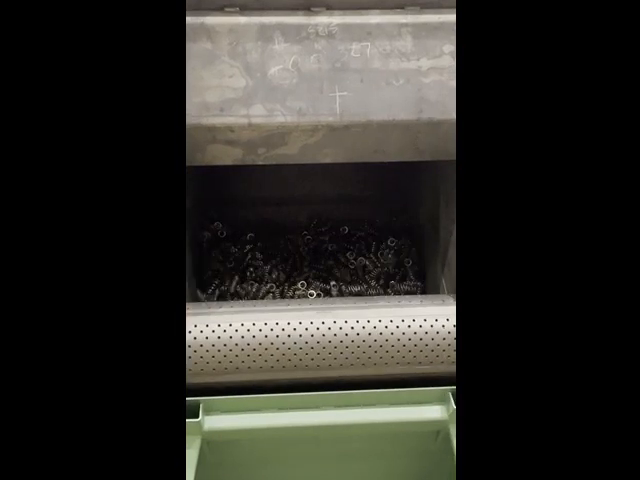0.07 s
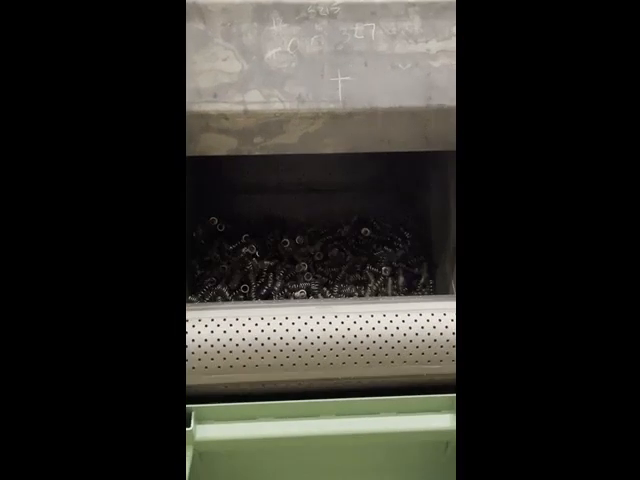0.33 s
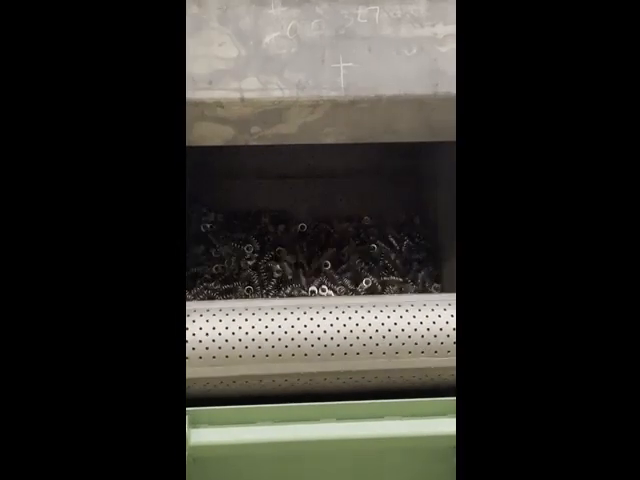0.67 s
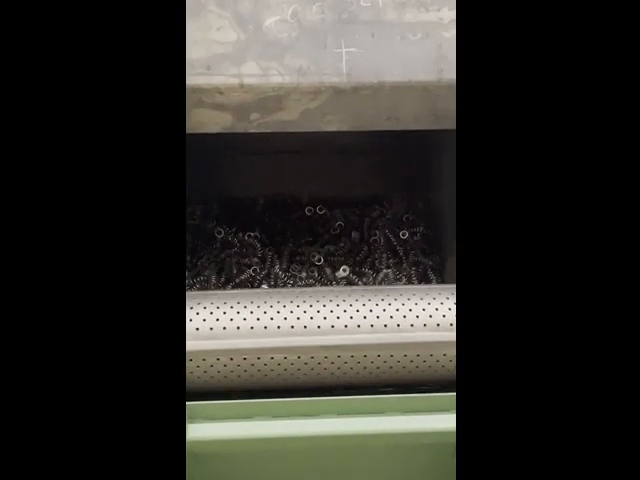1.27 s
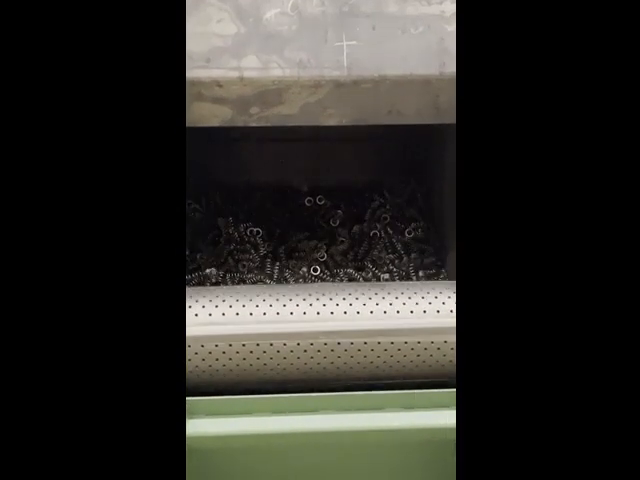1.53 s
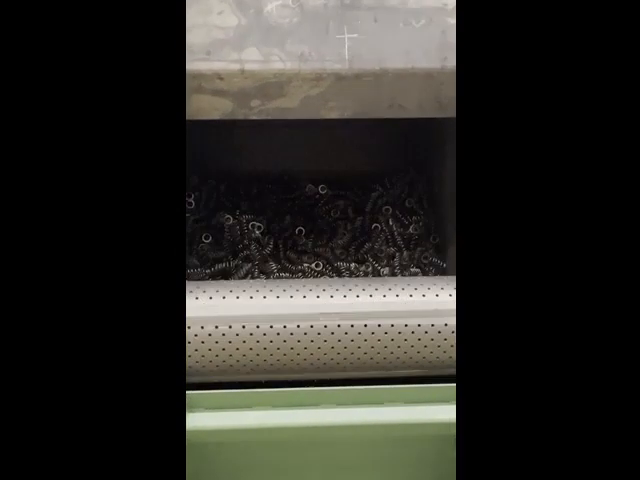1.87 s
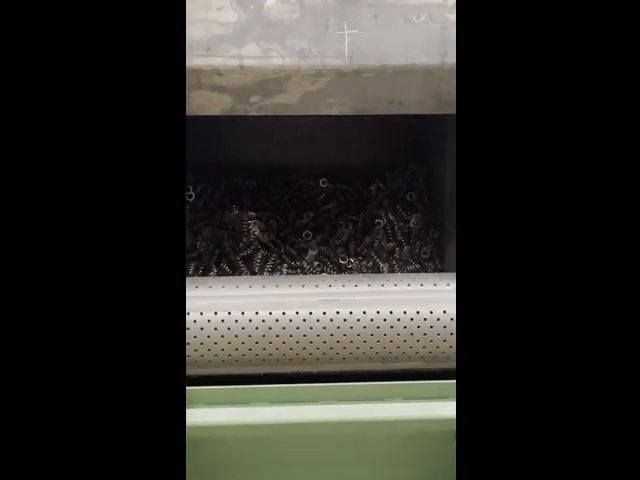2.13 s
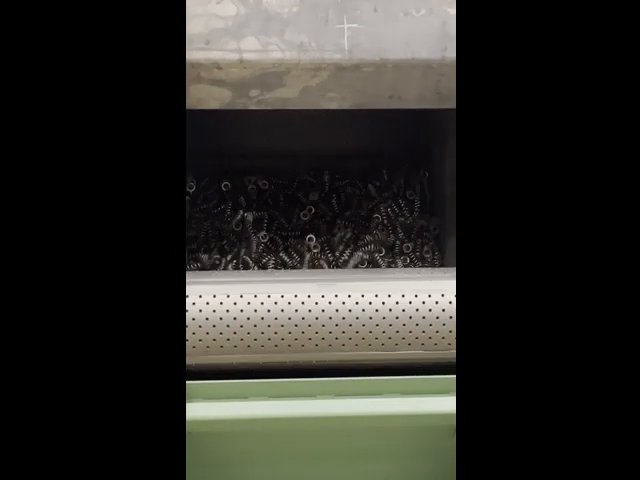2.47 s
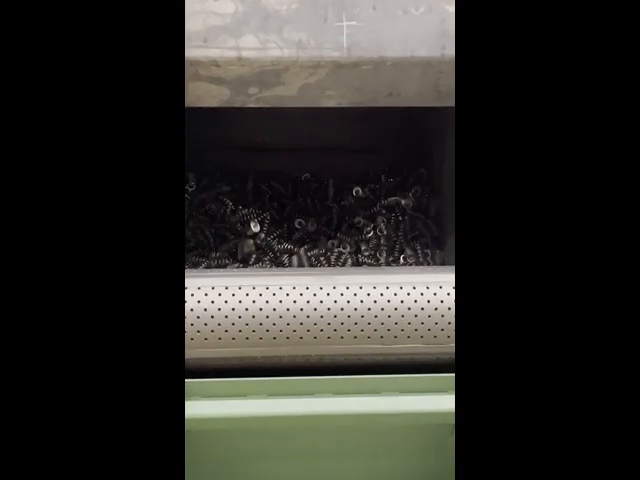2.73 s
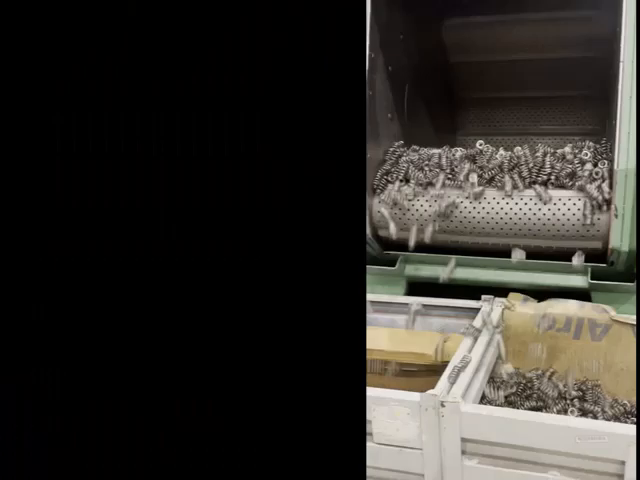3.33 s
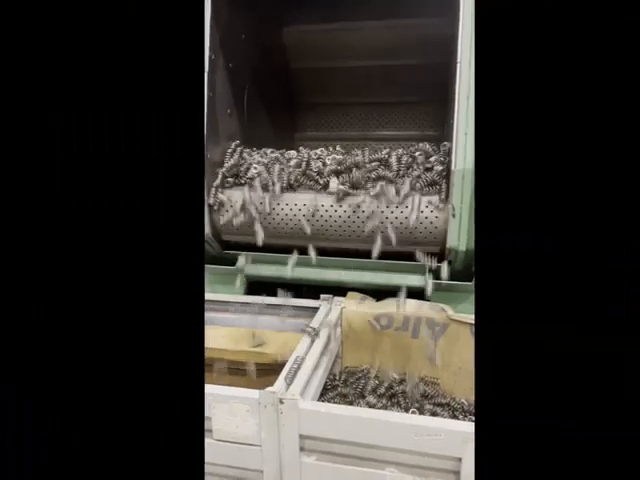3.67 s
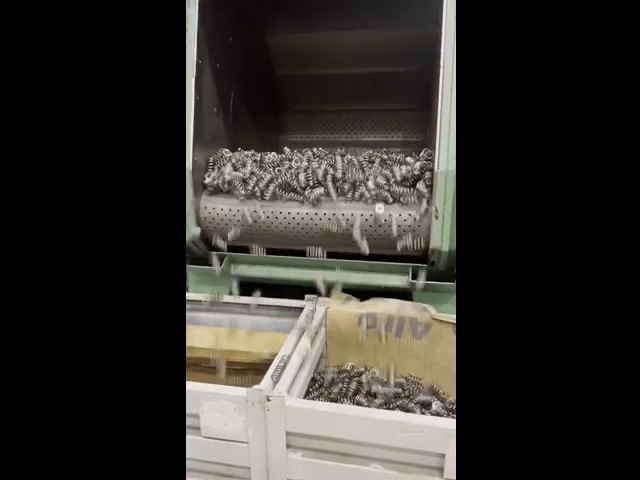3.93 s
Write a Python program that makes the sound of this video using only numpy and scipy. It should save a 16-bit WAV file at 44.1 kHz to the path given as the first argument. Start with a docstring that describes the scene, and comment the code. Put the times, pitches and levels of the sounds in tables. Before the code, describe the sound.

A factory tumbling machine rolls a heap of small metal parts, hissing and pattering above a rumble and steady whine. Near the end they clatter loudly against the steel wall, and the sound switches abruptly to parts landing in a bin.

```python
"""A tumbling machine rolls a heap of small steel parts in its drum. From the start they slide over each
other in a bright sizzle, above a low rumble and a fan's whine, and soon patter lightly on the steel wall.
The sizzle sinks midway, then swells; from about 2.9 s the parts clatter hard and clumps knock on the wall.
At 3.8 s the scene cuts to the machine unloading, with parts dropping into a bin."""
import sys
import numpy as np
from scipy import signal
from scipy.fft import rfft, irfft
from scipy.io import wavfile

SR = 44100
rng = np.random.default_rng(int(sys.argv[2]) if len(sys.argv) > 2 else 0)


def materialize(psi):
    """Save the field psi as 16-bit PCM at rate SR to the path in sys.argv[1].

    A 1-D psi becomes a single channel; in a 2-D psi each row is a channel.
    """
    bounded = np.clip(np.atleast_2d(psi).T, -1, 1)
    quanta = np.round(bounded * 32767).astype(np.int16)
    wavfile.write(sys.argv[1], SR, quanta)


N = 176400
T = np.arange(N) / SR
CUT_S, CUT_FADE_S = 3.817, .008


# Tone colour of the sliding parts: freq_hz, density_db
SIZZLE_COLOUR = [(300, -45), (1100, -12), (1700, -6.5), (2300, -10.6), (4300, -10.8), (6500, -7.8),
                 (8000, -5), (9300, -2.2), (10800, -3.8), (11800, -7.2), (13200, -10.6), (15000, -7.2),
                 (15800, -7.8)]
# Resonances of the small parts: pitch_hz, half_width_hz, boost_db
PART_RESONANCES = [(7400, 130, 5), (8570, 170, 5), (9620, 190, 4.8), (10820, 170, 4), (12200, 200, 3),
                   (13720, 200, 4.3), (15350, 220, 7)]
# How strongly the heap slides: time_s, level_db
SLIDE_ENVELOPE = [(0, -22), (.35, -19.5), (.65, -20.5), (1.0, -21), (1.28, -23), (1.45, -26), (1.85, -27.5),
                  (2.2, -25), (2.5, -21.5), (2.8, -17.5), (3.05, -17), (3.25, -17.5), (3.5, -20),
                  (3.8, -21.5)]
def sizzle(hits_per_s=17000, flicker_db=.35):
    """Thousands of tiny collisions a second ring the parts themselves as they slide."""
    clicks = sheet_ring(impacts(hits_per_s, spread_db=1.4), wet=.35)
    hz = np.linspace(0, SR / 2, 1000)
    peaks_db = sum(boost * np.exp(-((hz - f) / width) ** 2) for f, width, boost in PART_RESONANCES)
    colour = np.c_[hz, log_curve(SIZZLE_COLOUR, hz) + peaks_db]
    level = amp(curve(SLIDE_ENVELOPE, T) + flicker_db * wander(top_hz=22))
    return level * unit(stereo_colour(clicks, colour))


# Tone colour of the struck steel wall: freq_hz, density_db
WALL_COLOUR = [(100, -39), (250, -14), (315, 1), (400, -10), (610, -8), (740, -16.5), (980, -8.5),
               (1300, -15.5), (2200, -18), (2600, -15.5), (4200, -17.5), (6000, -14), (9000, -27),
               (16000, -29)]
# Parts falling on the wall: time_s, level_db
CLATTER_ENVELOPE = [(0, -62), (.35, -30.5), (1.1, -33), (2.0, -58), (2.4, -38), (2.8, -35), (2.95, -21),
                    (3.25, -22), (3.42, -25.5), (3.6, -23.5), (3.8, -29)]
def wall_clatter():
    """Single parts rain on the drum's steel wall."""
    hits = struck_steel(impacts(per_s=1600, spread_db=2.2), wet=1.0, modes_db=-19.5)
    return amp(curve(CLATTER_ENVELOPE, T)) * unit(stereo_colour(hits, WALL_COLOUR))


# Clumps hitting the wall: start_s, thud_db, clank_db, ring_db, ring_pitch_hz, burst_s
WALL_KNOCKS = [(2.870, -34, -26, -29, 2920, 0.014), (2.876, -36, -35, -27, 5300, .009),
               (2.929, -19.5, -22.5, -19.5, 5240, 0.0095), (2.984, -25, -28, -25, 5370, 0.0082),
               (3.019, -25, -23.5, -36, 3160, .011), (3.116, -41, -24, -30, 5440, .013),
               (3.192, -38, -25, -29, 1010, .007), (3.205, -25, -31, -23, 4800, 0.0054),
               (3.297, -17, -26, -25, 645, 0.0074), (3.453, -48, -28, -32.5, 5300, 0.0082),
               (3.577, -17.5, -32, -36, 5300, 0.013), (3.752, -26, -33.5, -42, 1000, .007)]
# Clumps landing in the bin: start_s, thud_db, clank_db, ring_db, ring_pitch_hz, burst_s
BIN_DROPS = [(3.835, -23, -36, -28, 3780, 0.0096), (3.875, -33, -28, -27.5, 3700, 0.016),
             (3.951, -38, -33, -27, 5970, 0.0044), (3.954, -45, -32, -30.5, 3100, 0.0043),
             (3.987, -19, -29, -30, 1000, 0.013)]
def clumps(landings, thud_top_hz=474, clank_top_hz=3800, ring_octaves=.45):
    """A clump lands as a burst of impacts: a thud, a clank and the ring of the patch of steel it hits."""
    out = np.zeros((2, N + SR))
    t = np.arange(SR // 3) / SR
    for start_s, *levels_db, ring_hz, burst_s in landings:
        clicks = rng.standard_normal((2, len(t))) * (rng.random(len(t)) < .3)
        burst = clicks * t / burst_s * np.exp(-2 * t / burst_s)
        hit = stereo_colour(struck_steel(burst, wet=1.0, modes_db=-.5), WALL_COLOUR)
        thud = (3, thud_top_hz, "low")
        clank = (3, [thud_top_hz, clank_top_hz], "band")
        ring = (1, ring_hz * 2 ** (ring_octaves * np.array([-.5, .5])), "band")
        at = round(start_s * SR)
        for db, band in zip(levels_db, (thud, clank, ring)):
            layer = signal.sosfilt(signal.butter(*band, fs=SR, output="sos"), hit)
            attack_rms = layer[:, :SR // 25].std()
            out[:, at:at + len(t)] += amp(db) * layer / attack_rms
    return out[:, :N]


# Tone colour of parts landing in the bin: freq_hz, density_db
BIN_COLOUR = [(40, -24), (140, -16), (215, -22), (310, -3), (420, -13), (580, -14), (700, -19), (950, -9),
              (1250, -14), (1600, -20), (4200, -24), (6000, -21), (10000, -20), (15500, -33)]
def bin_clatter(level_db=-25):
    """A thinner stream of parts drops into the bin and sets it ringing."""
    hits = struck_steel(impacts(per_s=420, spread_db=2.2), wet=1.9, modes_db=-22)
    return amp(level_db) * unit(stereo_colour(hits, BIN_COLOUR))


# Clear notes of the steel wall: pitch_hz, level_db, t60_s
WALL_MODES = [(309, 0.5, 0.079), (610, -10, 0.06), (961, -14, 0.07), (1027, -11, 0.05), (1313, -8, 0.1),
              (2080, -12, 0.054), (2455, -10, 0.12), (3150, -9.5, 0.19), (4430, -12, 0.055),
              (4780, -15, .08), (4970, -15, 0.11), (5210, -8, 0.13), (5730, -13, 0.038), (6400, -7, 0.08)]
def struck_steel(hits, wet, modes_db, pitch_scatter=.018):
    """Struck sheet gives dense ringing and a few clear modes, whose pitch varies from spot to spot."""
    t = np.arange(SR // 3) / SR
    detune = 1 + pitch_scatter * rng.uniform(-.96, 1, len(WALL_MODES))
    modes = sum(amp(db - 60 * t / t60) * np.cos(2 * np.pi * hz * shift * t)
                for (hz, db, t60), shift in zip(WALL_MODES, detune))
    notes = signal.fftconvolve(hits, modes[None] / np.linalg.norm(modes), axes=1)[:, :hits.shape[1]]
    return sheet_ring(hits, wet) + amp(modes_db) * notes


# Ring time of the wall: freq_hz, t60_s
WALL_DECAY = [(300, 0.22), (1000, 0.21), (5000, 0.15), (12000, 0.086)]
def sheet_ring(hits, wet):
    """Adds the dense ringing tail of steel sheet, longest in the bass."""
    hz, t, noise = signal.stft(rng.standard_normal((2, SR // 2)), SR, nperseg=256)
    decay = amp(-60 * t / log_curve(WALL_DECAY, hz)[:, None])
    tail = signal.istft(noise * decay, SR)[1]
    ringing = signal.fftconvolve(hits, tail / np.linalg.norm(tail[0]), axes=1)
    return hits + wet * ringing[:, :hits.shape[1]]


# Tone colour of the turning drum: freq_hz, density_db
RUMBLE_COLOUR = [(20, -22), (30, -22), (40, -9.5), (60, -4), (85, -0.5), (112, -3.5), (160, -0.9),
                 (195, -7.5), (225, -1.5), (250, -8), (300, -6.5), (400, -14), (530, -20.5), (600, -17),
                 (720, -21), (950, -23.5), (1400, -27.5), (2200, -29.5), (4000, -31), (9000, -36),
                 (16000, -46)]
# Rise and fall of the rumble: time_s, level_db
RUMBLE_ENVELOPE = [(0, -18.5), (.8, -20), (1.6, -19.5), (2.3, -19), (3.1, -17.5), (3.8, -20.5)]
def rumble(shake_db=1):
    """The low bed: the loaded drum shakes unevenly as it turns."""
    level = amp(curve(RUMBLE_ENVELOPE, T) + shake_db * wander(top_hz=24.2))
    return level * unit(stereo_colour(rng.standard_normal((2, N)), RUMBLE_COLOUR))


# Tones of fan and motor: pitch_hz, base_level_db
MACHINE_TONES = [(61, -35.5), (110.6, -28), (157.5, -31.5), (474.7, -29), (949.4, -48.5), (1662.8, -43.5),
                 (3117, -52)]
# Fader ride on the tones above 200 Hz: time_s, gain_db
WHINE_ENVELOPE = [(0, 4), (.7, 1.5), (1.25, -4.5), (1.7, 2), (2.3, 2), (3.1, 3), (3.6, -2.5), (3.8, -8),
                  (3.84, -24), (4, -11)]
def whine(tumbling, drift_hz=.5, waver_db=.82, pan_left_db=1.1, right_lead_rad=.52):
    """Fan and motor tones waver slightly; the low ones end with the tumbling."""
    out = np.zeros((2, N))
    for hz, db in MACHINE_TONES:
        pitch_hz = hz + drift_hz * wander(top_hz=5.7)
        phase = 2 * np.pi * (np.cumsum(pitch_hz) / SR + rng.random())
        level = np.sqrt(2) * amp(db + waver_db * wander(top_hz=1.7))
        if hz < 200:
            out += level * np.sin(phase) * tumbling
        else:
            left = amp(pan_left_db) * np.sin(phase)
            right = amp(-pan_left_db) * np.sin(phase + right_lead_rad)
            out += level * amp(curve(WHINE_ENVELOPE, T)) * np.array([left, right])
    return out


def impacts(per_s, spread_db):
    """Random clicks, most small and a few large."""
    size = amp(spread_db * np.minimum(rng.exponential(1, N), 4))
    lands = rng.random(N) < per_s / SR
    return unit(size * lands * rng.standard_normal((2, N)))


# Stereo image at the microphone pair: freq_hz, left_right_correlation
STEREO_LIKENESS = [(30, 1), (100, .999), (200, .985), (400, .93), (1000, .88), (2500, .76), (6000, .88),
                   (8000, .93), (15000, .9)]
def stereo_colour(x, colour):
    """Blends two unrelated channels into a partly alike pair and gives it a minimum-phase EQ."""
    size = 2 * x.shape[1]
    hz = np.fft.rfftfreq(size, 1 / SR)
    left, other = rfft(x, size)
    likeness = np.clip(log_curve(STEREO_LIKENESS, hz), -1, 1)
    right = likeness * left + np.sqrt(1 - likeness ** 2) * other
    log_gain = np.log(amp(log_curve(colour, hz)))
    mirrored = np.r_[log_gain, log_gain[-2:0:-1]]
    eq = np.exp(np.conj(signal.hilbert(mirrored)))[:len(hz)]
    return irfft(np.array([left, right]) * eq, size)[:, :x.shape[1]]


def wander(top_hz):
    """Slow random modulation of rms 1, rolling off above top_hz."""
    hz = np.fft.rfftfreq(N, 1 / SR)
    return unit(irfft(rfft(rng.standard_normal(N)) * (hz > 0) / (1 + (hz / top_hz) ** 4), N))


def amp(db):
    """Decibels to gain."""
    return 10 ** (np.asarray(db) / 20)


def unit(x):
    """Scales to rms 1."""
    return x / np.sqrt(np.mean(x ** 2) + 1e-20)


def curve(points, at):
    """Joins breakpoints by straight lines."""
    return np.interp(at, *np.transpose(points))


def log_curve(points, hz):
    """Joins breakpoints on a log-frequency axis."""
    f, value = np.transpose(points)
    return np.interp(np.log(hz + 1), np.log(f + 1), value)


def scene():
    """The mix: tumbling, then a quick cut to unloading."""
    tumbling = np.clip((CUT_S - T) / CUT_FADE_S, 0, 1)
    unloading = (1 - tumbling) * np.clip((T - CUT_S) / .01, .4, 1)  # fully up 10 ms after the cut
    drum = wall_clatter() + rumble() + sizzle() + clumps(WALL_KNOCKS)
    return tumbling * drum + unloading * bin_clatter() + clumps(BIN_DROPS) + whine(tumbling)


# Phase between the two microphone ports: freq_hz, left_lead_rad
PORT_PHASE = [(1000, 0), (1650, -.3), (2500, .7), (3500, .35), (4400, .7), (5000, 0), (5550, .1),
              (6000, 1.3), (7500, 3.14), (9000, 4.3), (11000, 6.28), (12200, 7.2), (14350, 9.42),
              (15700, 10.6)]
def record(dry, ceiling=.92, high_cut_hz=15800):
    """Two microphone ports hear the treble out of step; a soft clip and a high cut follow."""
    hz = np.fft.rfftfreq(2 * N, 1 / SR)
    phase_shift = np.exp(.5j * np.array([[1], [-1]]) * curve(PORT_PHASE, hz))
    shifted = irfft(rfft(dry, 2 * N) * phase_shift)[:, :N]
    rounded = shifted / (1 + (shifted / ceiling) ** 6) ** (1 / 6)
    high_cut = signal.firwin(511, high_cut_hz, window=("kaiser", 9), fs=SR)
    return signal.oaconvolve(rounded, high_cut[None], "same")


dry = scene()
out = record(dry)
materialize(out)
```